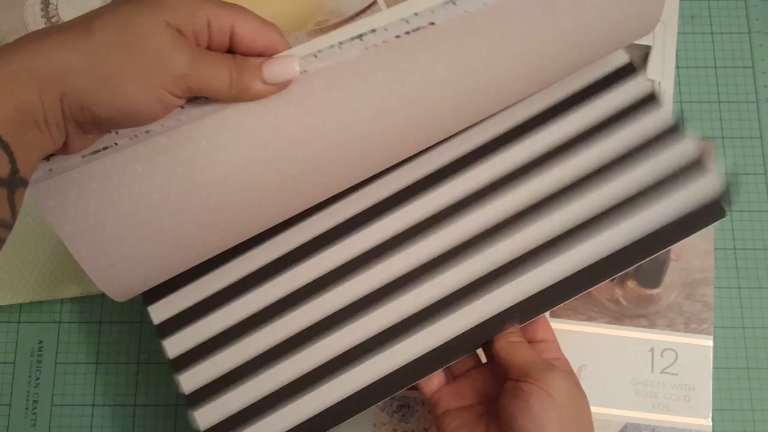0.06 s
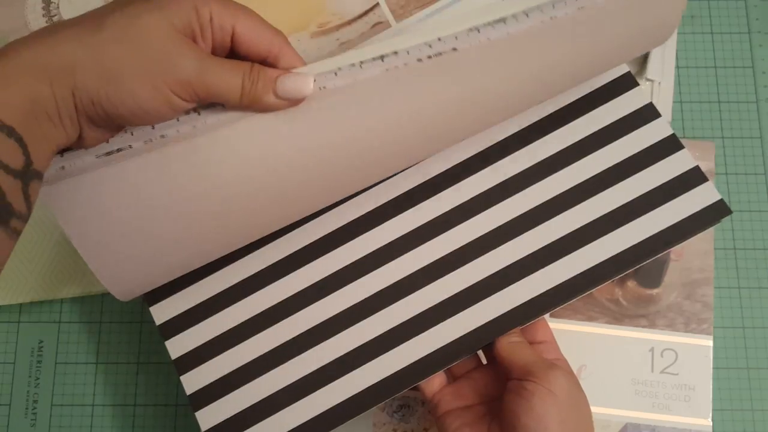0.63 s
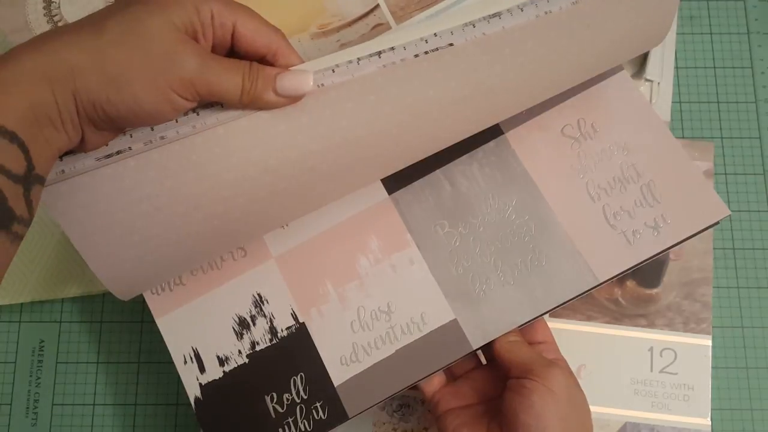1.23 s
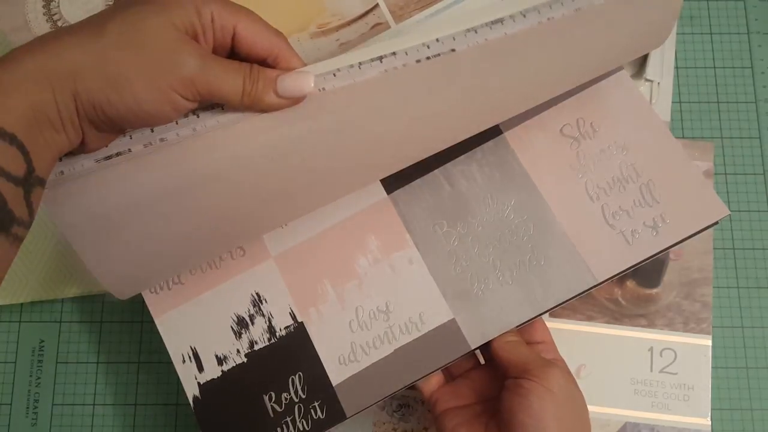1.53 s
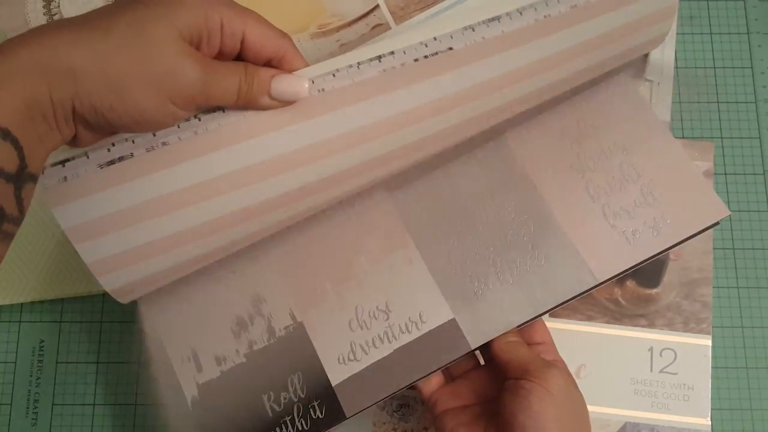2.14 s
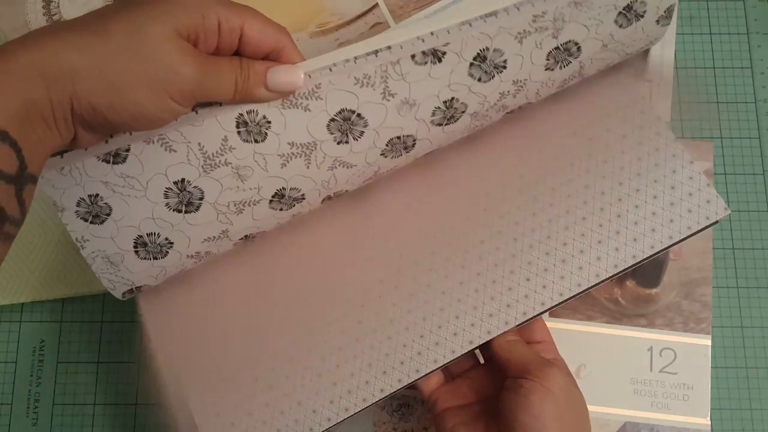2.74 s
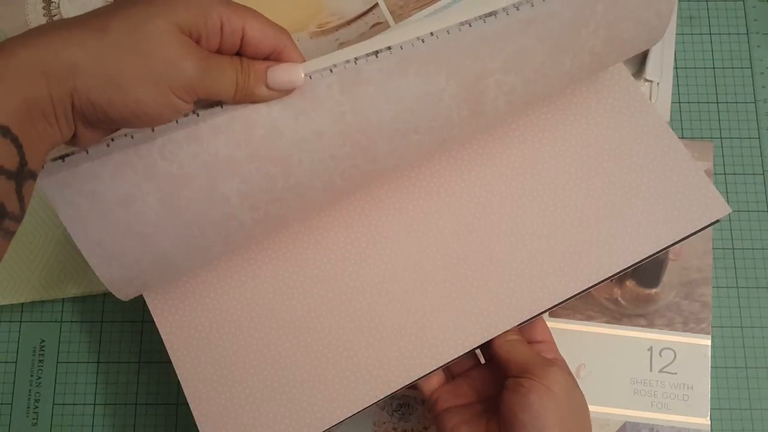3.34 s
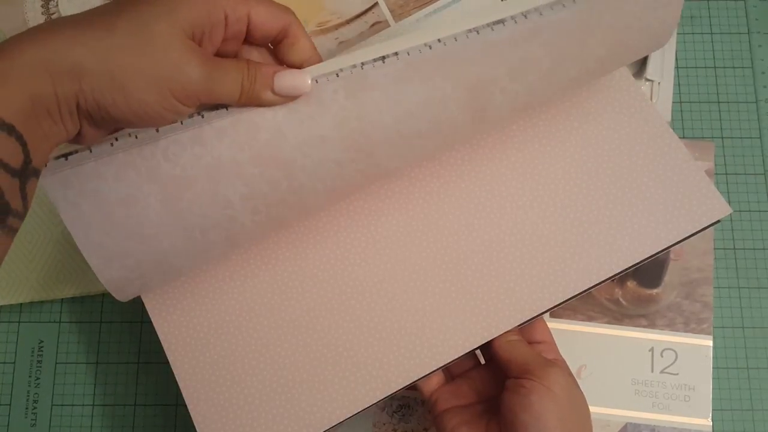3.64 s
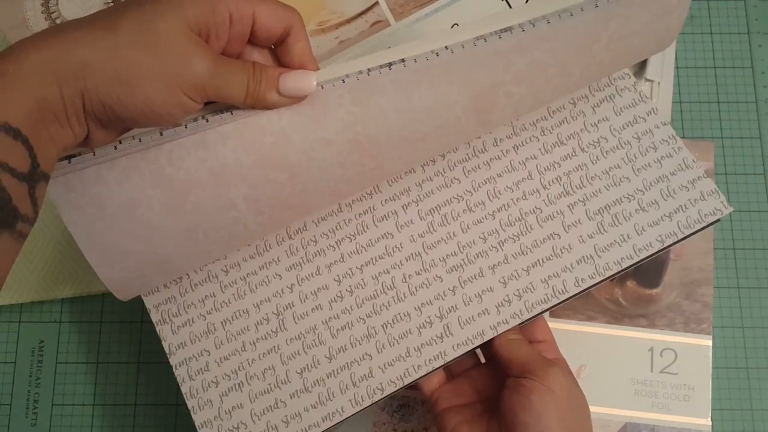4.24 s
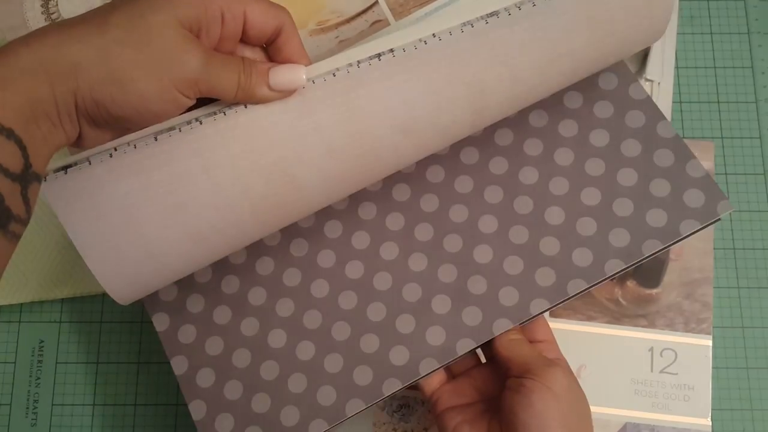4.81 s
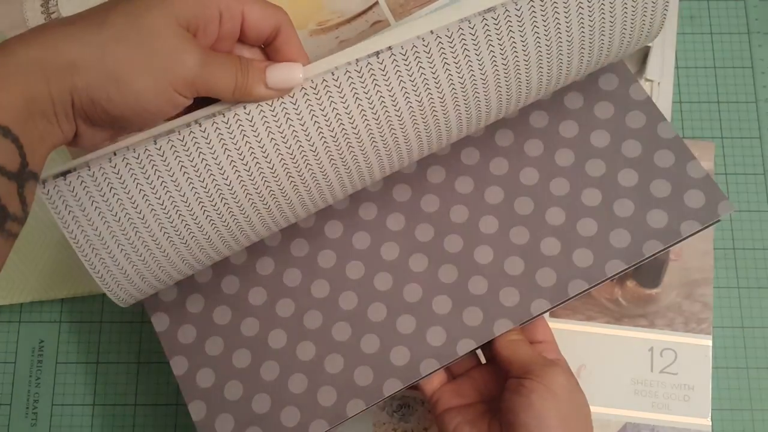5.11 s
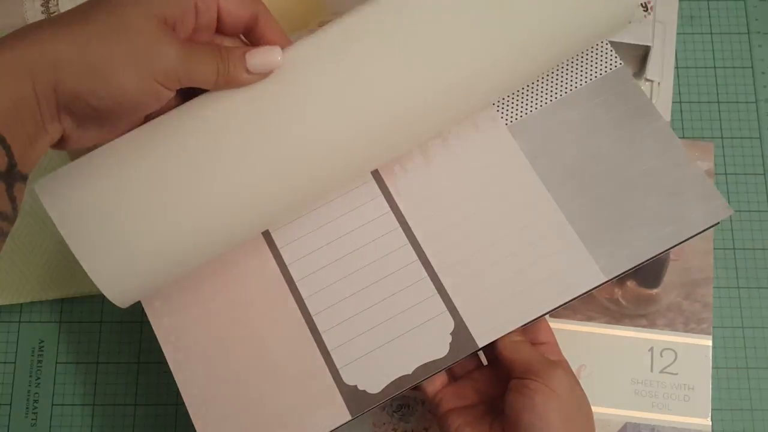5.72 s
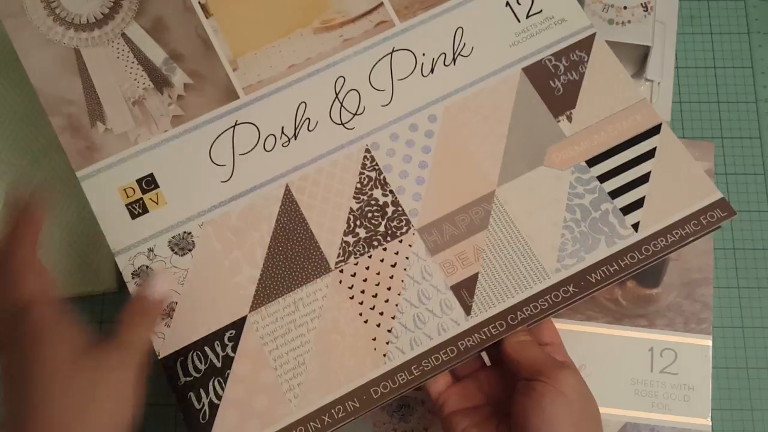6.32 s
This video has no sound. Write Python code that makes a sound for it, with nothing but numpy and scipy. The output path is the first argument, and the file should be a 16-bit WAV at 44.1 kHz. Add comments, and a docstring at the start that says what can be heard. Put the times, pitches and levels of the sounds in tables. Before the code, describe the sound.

Close, crisp flicks of thick paper being leafed through, followed by one louder flap and nails clicking on the closing cover.

```python
"""Crisp flicks and slaps of cardstock, leafed through by hand close to a stereo pair in a quiet room.
Each bent sheet scrapes off the thumb and slaps onto the stack; fingers tap and the paper buckles.
Then the held sheets flap down together, the cover closes, and a hand lands nails first and slides across.
Behind it all lie room air, a low machine rumble, mains hum and a very faint electrical tick."""
import sys
import numpy as np
from scipy import signal
from scipy.fft import rfft, irfft, next_fast_len
from scipy.io import wavfile

SR = 44100
rng = np.random.default_rng(int(sys.argv[2]) if len(sys.argv) > 2 else 0)


def materialize(psi):
    """Save the field psi as 16-bit PCM at rate SR to the path in sys.argv[1].

    A 1-D psi becomes a single channel; in a 2-D psi each row is a channel.
    """
    bounded = np.clip(np.atleast_2d(psi).T, -1, 1)
    quanta = np.round(bounded * 32767).astype(np.int16)
    wavfile.write(sys.argv[1], SR, quanta)


N = 280961
TIME = np.arange(N) / SR


def from_db(db):
    """Decibels to gain."""
    return 10 ** (np.asarray(db) / 20)


def rms_one(x):
    """Scale to rms 1."""
    return x / np.sqrt(np.mean(x ** 2) + 1e-20)


def at_bins(points, size):
    """A table over log frequency, read at the bins of a transform."""
    hz, value = np.transpose(points)
    bin_hz = np.arange(size // 2 + 1) * SR / size
    return np.interp(np.log(bin_hz + 1), np.log(hz), value)


def colour(x, spectrum):
    """Shape a signal by a spectrum with rows of f/Hz, gain/dB."""
    size = x.shape[-1]
    return irfft(rfft(x) * from_db(at_bins(spectrum, size)), size)


def diffuse(spectrum, size):
    """Noise from all around: alike at both microphones in the bass, unrelated in the treble."""
    # coherence between the microphones: f/Hz, likeness from 0 to 1
    likeness = [(50, 1), (300, 0.82), (700, 0.49), (1500, 0), (3000, 0), (16000, 0)]
    padded = next_fast_len(size)
    mid, side = rfft(rng.standard_normal((2, padded)))
    alike = np.clip(at_bins(likeness, padded), 0, 1)
    pair = np.sqrt((1 + alike) / 2) * mid + np.sqrt((1 - alike) / 2) * side * [[1], [-1]]
    return irfft(pair * from_db(at_bins(spectrum, padded)), padded)[:, :size]


def resonate(x, hz, width_hz):
    """A resonance with gain 1 at its peak."""
    radius = np.exp(-np.pi * width_hz / SR)
    feedback = [1, -2 * radius * np.cos(2 * np.pi * hz / SR), radius ** 2]
    return signal.lfilter(np.array([1, 0, -1]) * (1 - radius ** 2) / 2, feedback, x + 1e-18)


def low_pass(x, hz, order=2):
    """Take the treble off."""
    return signal.sosfilt(signal.butter(order, min(hz, SR / 2 - 1000), fs=SR, output="sos"), x)


def delay(x, s):
    """The same sound s seconds later."""
    return np.pad(x, (max(round(s * SR), 0), 0))[:N]


def add(track, sound, s):
    """Mix a sound into a track from s seconds on."""
    start = max(round(s * SR), 0)
    track[..., start:start + sound.shape[-1]] += sound[..., :max(N - start, 0)]


def room_tone():
    """Air and a low machine rumble from all around, with mains hum in the centre."""
    # spectra of the room air and of the rumble: f/Hz, relative level/dB
    air_spectrum = [(100, -25), (160, -3), (240, -0.5), (290, 0), (380, 0), (470, -6.5), (580, 0),
                    (640, -6.5), (1000, -10), (1300, -15), (2200, -19), (4700, -30), (11000, -36.5),
                    (15500, -30.5)]
    rumble_spectrum = [(20, -33), (40, -1.5), (58, -0.5), (72, -4.5), (84, 9), (96, 15), (110, 9.5),
                       (125, 5), (145, 10), (175, -24), (220, -38)]
    # mains hum and its octave: f/Hz, level/dB
    hum_tones = [(59.4, -66), (119.0, -64)]
    air = from_db(-60.5) * rms_one(diffuse(air_spectrum, N))
    rumble = from_db(-58.5) * rms_one(diffuse(rumble_spectrum, N))
    hum = sum(np.sqrt(2) * from_db(db) * np.sin(2 * np.pi * (hz * TIME + rng.random()))
              for hz, db in hum_tones)
    return air + rumble + hum


def grains(spread_db):
    """Paper fibres catch and let go: dense clicks of uneven size."""
    return rms_one(rng.standard_normal(N) * from_db(spread_db * np.minimum(rng.exponential(1, N), 4)))


def swells(rows, settle_s=0.006):
    """Envelope of slides that speed up to a contact, then die away; rows of t/s, length/s, level/dB."""
    out, t = np.zeros(N), np.arange(-SR // 8, SR // 8) / SR
    for s, length_s, db in rows:
        shape = np.exp(-np.where(t < 0, (t / length_s) ** 2, t / settle_s))
        add(out, from_db(db) * shape[t >= -s], s + t[0])
    return out


def rustles(rows):
    """Dull friction of sliding card; rows of t/s, length/s, level/dB."""
    friction = resonate(grains(spread_db=1.0), hz=470, width_hz=3400)
    return swells(rows) * rms_one(low_pass(friction, 2220, order=3))


def cracks(rows, lead_s, rise_s, fall_s):
    """Bright, fast bending waves arrive ahead of a contact's slap; rows of t/s, level/dB."""
    # spectrum of a snapping card edge: f/Hz, relative level/dB
    edge_spectrum = [(100, -8), (700, -3.5), (2000, 4.5), (3200, 0.5), (5000, -1.5), (7000, -2.5),
                     (9000, 0.5), (10800, -6.5), (13000, -7), (16000, -14.5)]
    out, t = np.zeros(N), np.arange(-512, 512) / SR
    shape = np.exp(np.minimum(t / rise_s, -t / fall_s))
    for s, db in rows:
        scatter = rfft(rng.standard_normal(len(t)) * shape)
        # a whole edge snaps at once: its arrivals are scattered in time, but even in spectrum
        even = irfft(scatter / (np.abs(scatter) + 1e-12)) * shape ** 0.25
        burst = rms_one(colour(even, edge_spectrum)) * np.sqrt(np.mean(shape ** 2))
        add(out, from_db(db) * burst, s - lead_s + t[0])
    return out


def slaps(rows, damping, cutoff_ratio):
    """Struck card makes a damped swing, rounded by the soft contact; rows of t/s, level/dB, f/Hz."""
    out = np.zeros(N)
    for s, db, hz in rows:
        ring = resonate(signal.unit_impulse(2048), hz, damping * hz)
        swing = low_pass(ring, cutoff_ratio * hz, order=3)
        peak = np.argmax(swing)
        add(out, from_db(db) * swing / swing[peak], s - peak / SR)
    return out


def flips():
    """An edge creeps along the thumb, slips and scrapes the stack; the sheet slaps and the pad gives."""
    # sheets leaving the thumb: t/s, slap level/dB, edge scrape level/dB, thumb rub level/dB
    sheets = [(0.0428, -30.5, -34, -62.5), (0.7185, -36.5, -35.5, -71), (1.6068, -35.5, -34, -75),
              (2.1711, -27, -37.5, -56.5), (2.591, -29.5, -36.5, -70), (2.7654, -29, -35.5, -72),
              (3.2762, -30, -33, -71), (3.8763, -27.5, -30.5, -79), (4.3302, -28.5, -30.5, -68),
              (4.6188, -29, -31, -54), (4.9646, -25, -30, -64)]
    rub_s, slap_hz = 0.022, 945
    thud_lag_s, thud_db, thud_hz = 0.00296, -18.5, 299
    edges = [(s, db) for s, _, db, _ in sheets]
    rub = rustles([(s, rub_s, db) for s, *_, db in sheets])
    creep = from_db(-31.5) * cracks(edges, lead_s=0.0011, rise_s=0.032, fall_s=0.0022)
    slip = from_db(-21) * cracks(edges, lead_s=0.0017, rise_s=0.00058, fall_s=0.0018)
    scrape = cracks(edges, lead_s=0.0007, rise_s=0.00069, fall_s=0.00062)
    slap = slaps([(s, db, slap_hz) for s, db, *_ in sheets], damping=0.67, cutoff_ratio=3.08)
    thud = slaps([(s + thud_lag_s, db + thud_db, thud_hz) for s, db, *_ in sheets],
                 damping=1.0, cutoff_ratio=1.73)
    return rub + creep + slip + scrape + slap + thud


def pops():
    """A curved sheet snaps through; the tighter the bend, the higher it rings."""
    # buckling sheets: t/s, ring level/dB, f/Hz, crack level/dB
    buckles = [(0.0789, -36, 1760, -55), (.1475, -32, 2250, -50), (1.6875, -43.5, 2630, -70),
               (1.7593, -36.5, 2260, -53), (2.2362, -30, 1510, -64), (2.6499, -32.5, 2100, -60),
               (2.7654, -25.5, 3340, -62), (3.3543, -30.5, 1600, -76), (5.2558, -15, 1530, -30),
               (5.268, -10, 1400, -37), (5.304, -34, 1290, -66), (6.1359, -30, 1680, -40)]
    ring = slaps([(s, db, hz) for s, db, hz, _ in buckles], damping=0.76, cutoff_ratio=3.6)
    snap = cracks([(s, db) for s, *_, db in buckles], lead_s=0.0001, rise_s=0.00067, fall_s=0.001)
    return low_pass(ring, 5560, order=8) + snap


def ticking(first_s=0.0954, period_s=0.1024):
    """A very faint, regular electrical tick in the treble, the same in both channels."""
    onsets = (np.arange(first_s, TIME[-1], period_s) * SR).astype(int)
    clicks = np.zeros(N)
    clicks[onsets] = from_db(-51.5 + rng.normal(0, 3.4, len(onsets)))
    return resonate(clicks, hz=8500, width_hz=6000)


def hisses(rows):
    """The thin hiss of fibres under a sliding edge; rows of t/s, length/s, level/dB."""
    # f/Hz, relative level/dB
    fibre_spectrum = [(1500, -14), (4200, 12.5), (6500, 2.5), (9000, -3.0), (16000, -14)]
    return swells(rows) * rms_one(colour(grains(spread_db=1.5), fibre_spectrum))


def landings():
    """A falling sheet slides over its neighbour, touches edge first, slaps and squeezes out air."""
    # loose sheets landing flat: t/s, slap level/dB, slide length/s, slide level/dB, hiss level/dB
    falls = [(0.1594, -41.5, 0.0058, -62, -76), (3.651, -36.5, 0.0028, -50.5, -59.5),
             (3.666, -37, 0.0043, -54, -60.5), (5.247, -30, .005, -45, -47),
             (5.2745, -24, 0.019, -35, -45.5), (5.3155, -33.5, 0.02, -43, -73),
             (5.3293, -27.5, .008, -47.5, -70), (5.8178, -26.5, 0.016, -41.5, -46.5),
             (5.8266, -30.5, 0.003, -38, -47)]
    slap_hz, edge_over_hiss_db = 626, 8
    puff_lag_s, puff_db, puff_hz = 0.0018, -11.5, 167.5
    slide = rustles([(s, length_s, db) for s, _, length_s, db, _ in falls])
    hiss = hisses([(s, length_s, db) for s, _, length_s, _, db in falls])
    edge = cracks([(s, hiss_db + edge_over_hiss_db) for s, *_, hiss_db in falls],
                  lead_s=0.0008, rise_s=0.0014, fall_s=0.00054)
    slap = slaps([(s, db, slap_hz) for s, db, *_ in falls], damping=0.82, cutoff_ratio=4.0)
    puff = slaps([(s + puff_lag_s, db + puff_db, puff_hz) for s, db, *_ in falls],
                 damping=0.48, cutoff_ratio=3.2)
    return slide + hiss + edge + slap + puff


def creaks(count):
    """The bent sheets give off tiny creaks between the fingers."""
    when, strength = rng.random((count, 2)).T
    clicks = np.zeros(N)
    clicks[(when * N).astype(int)] = from_db(-70 + 12 * strength)
    return resonate(clicks, hz=1900, width_hz=1800)


def taps(knock_hz=904, crack_db=-19.5):
    """A fingertip knocks on the card; the harder the knock, the louder its crack."""
    # fingers meeting the pad: t/s, level/dB
    touches = [(.4682, -31.5), (.5312, -50), (0.5607, -41.5), (2.1179, -45.5), (4.8237, -43.5),
               (5.2335, -22), (5.2464, -38), (5.341, -35), (5.7695, -33.5), (6.1933, -39), (6.214, -39)]
    knock = slaps([(s, db, knock_hz) for s, db in touches], damping=0.96, cutoff_ratio=4.1)
    crack = cracks([(s, db + crack_db) for s, db in touches],
                   lead_s=0.0003, rise_s=0.0019, fall_s=0.00032)
    return knock + crack


def cover_and_nails():
    """The cover lands with a click and thumps shut on a cushion of air; then nails click and skid on it."""
    # sharp clicks as the cover lands, then fingernails on it: t/s, click level/dB, f/Hz, crack level/dB
    contacts = [(6.1098, -39, 2020, -31.5), (6.1226, -11.5, 7900, -26.5), (6.1306, -13, 5240, -18)]
    shut_s, shut_db, shut_hz = 6.1165, -39, 297
    skid_s, skid_db = 0.0024, -18
    thump = slaps([(shut_s, shut_db, shut_hz)], damping=0.3, cutoff_ratio=4.0)
    clicks = slaps([(s, db, hz) for s, db, hz, _ in contacts], damping=0.45, cutoff_ratio=2.2)
    snaps = cracks([(s, db) for s, *_, db in contacts], lead_s=0.0001, rise_s=0.00015, fall_s=0.0006)
    skids = hisses([(s, skid_s, db + skid_db) for s, *_, db in contacts])
    return thump + clicks + snaps + skids


def palm_stroke(start_s=6.228, attack_s=0.018, rise_db_per_s=28):
    """Skin rubs the cover and makes it sing faintly, louder as the palm gathers speed."""
    # resonances of the glossy cover under the palm: f/Hz, width/Hz, gain/dB
    cover_modes = [(600, 700, -9), (1110, 150, -7), (2220, 240, 0), (4100, 500, -12), (5450, 500, -12),
                   (9030, 900, -21)]
    friction = grains(spread_db=2.5)
    rub = sum(from_db(db) * resonate(friction, hz, width) for hz, width, db in cover_modes)
    since = TIME - start_s
    envelope = np.clip(since / attack_s, 0, 1) * from_db(-63 + rise_db_per_s * since)
    return rms_one(low_pass(rub, 7600)) * envelope


def at_microphones(x, pan_db, right_lag_s=0.0001):
    """The pad's low modes and near echoes join a sound, which reaches the left microphone first."""
    # low modes of the pad: f/Hz, gain/dB, t60/s
    pad_modes = [(122, 9, 0.037), (246, 1.5, 0.049), (337, 6.5, 0.026), (403, 1, 0.057), (611, 1.5, 0.12),
                 (705, 2.5, 0.087)]
    # reflections off surfaces close by: delay/s, gain/dB
    reflections = [(.0029, -12), (.0059, -18), (.0088, -19)]
    body = sum(from_db(db) * resonate(x, hz, np.log(1000) / (np.pi * t60)) for hz, db, t60 in pad_modes)
    echoes = low_pass(sum(from_db(db) * delay(x, s) for s, db in reflections), 3100)
    near = x + body + echoes
    return np.array([from_db(pan_db / 2) * near, from_db(-pan_db / 2) * delay(near, right_lag_s)])


def tail(x, spectrum, t60, build_s):
    """A dense stereo ring that builds up and dies away; the spectrum is its gain."""
    t = TIME[:SR // 3]
    shape = from_db(-60 * t / t60) * (1 - np.exp(-t / build_s))
    response = diffuse(spectrum, len(t)) * shape / np.sqrt(np.sum(shape ** 2))
    return signal.oaconvolve(x[None], response, axes=1)[:, :N]


def flutter(x, stack_shapes):
    """Bending waves run about in the loose sheets, ringing differently as the stack changes shape."""
    # ring of the loose sheets: f/Hz, gain/dB
    sheet_spectrum = [(150, -33), (400, 4.5), (1000, 2), (2000, -2.5), (3200, -9), (5500, 0), (9000, -5.5),
                      (15000, -3)]
    out, step = np.zeros((2, N)), N // stack_shapes + 1
    for start in range(0, N, step):
        ring = tail(x[start:start + step], sheet_spectrum, t60=0.028, build_s=0.00041)
        add(out, ring, start / SR)
    return out


def room_reverb(x):
    """The walls of the small room return a short, bass-heavy tail."""
    # response of the room: f/Hz, gain/dB
    room_spectrum = [(150, 2.5), (500, -5), (1000, -10.5), (2000, -9), (3000, -12), (4500, -12.5),
                     (6500, -16.5), (10000, -15), (16000, -16)]
    return tail(x, room_spectrum, t60=0.27, build_s=0.0022)


def scene():
    """Paper and hand, close up and a little left of centre, ring on in the sheets and in the room."""
    paper = flips() + landings() + taps() + pops() + creaks(count=30)
    hand = cover_and_nails() + palm_stroke()
    direct = at_microphones(paper, pan_db=1.0) + at_microphones(hand, pan_db=2.2)
    ringing = paper + from_db(-1) * hand   # the shut pad rings less
    rings = flutter(ringing, stack_shapes=18) + room_reverb(ringing)
    return direct + rings + room_tone() + ticking()


def record(dry):
    """The top is cut steeply above 16.4 kHz."""
    return signal.sosfilt(signal.ellip(10, 0.2, 70, 16400, fs=SR, output="sos"), dry)


dry = scene()
out = record(dry)
materialize(out)
```